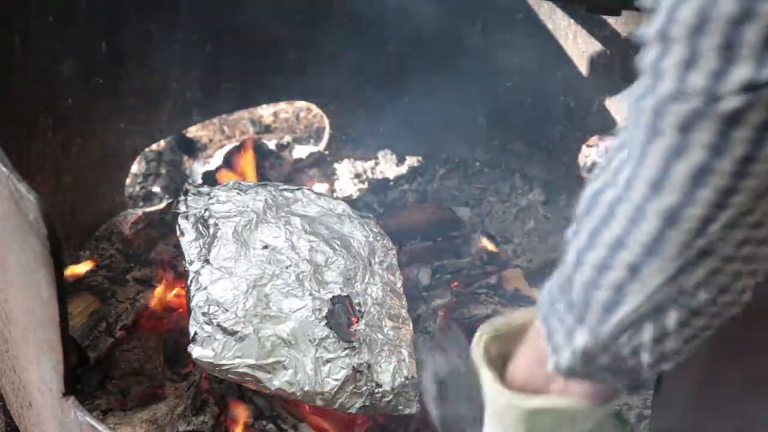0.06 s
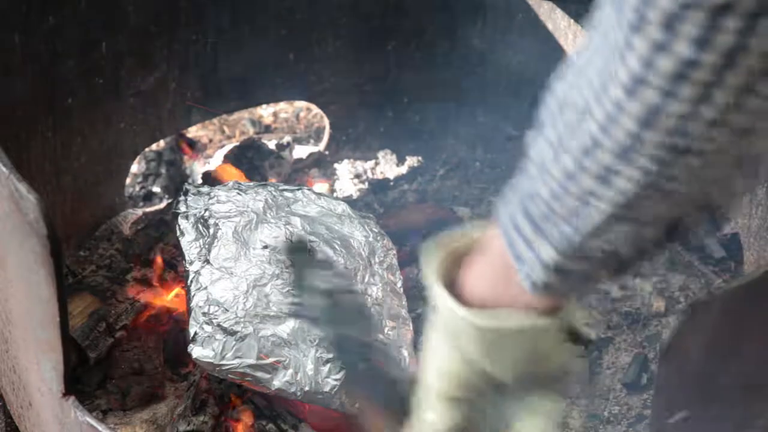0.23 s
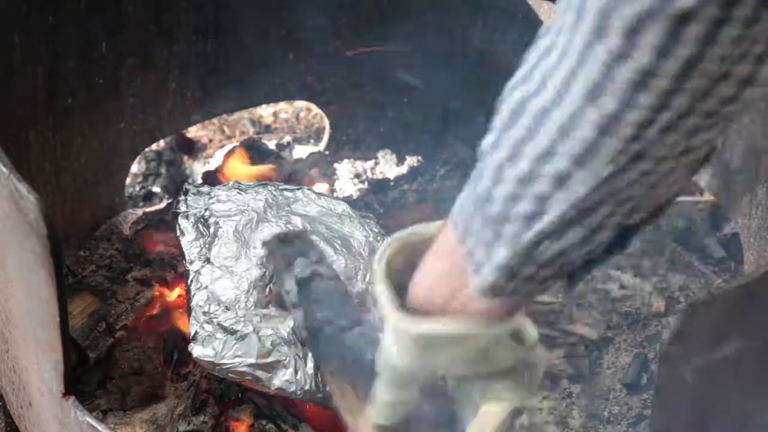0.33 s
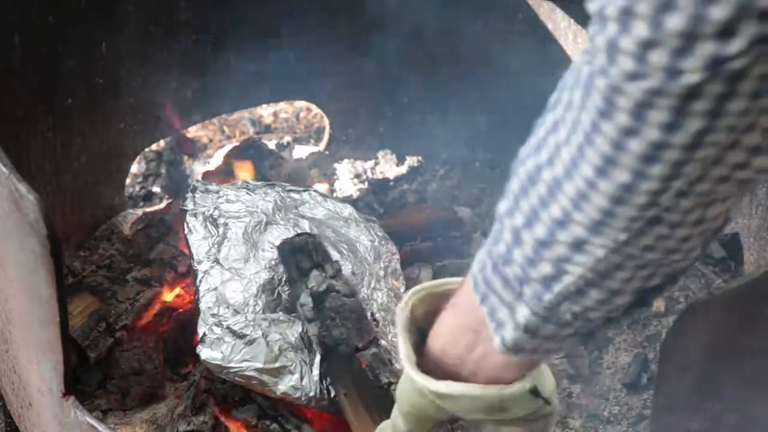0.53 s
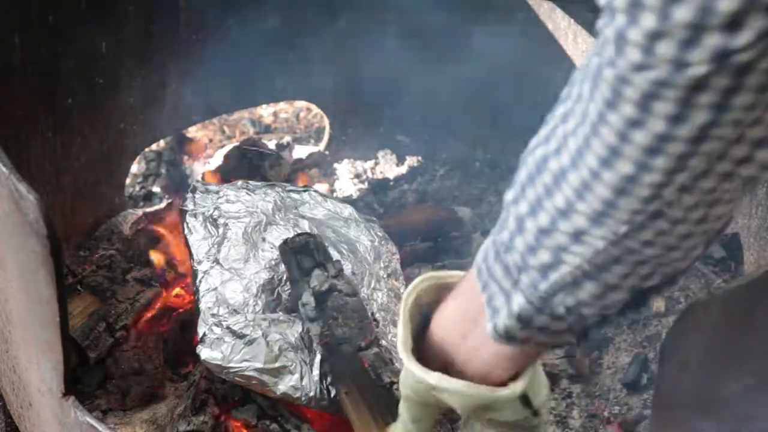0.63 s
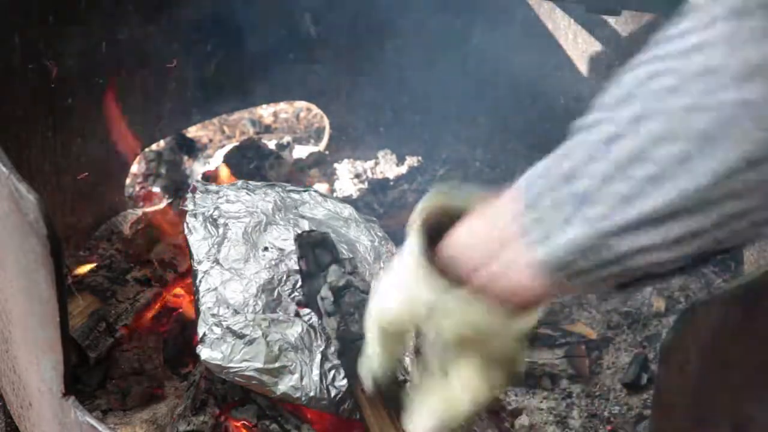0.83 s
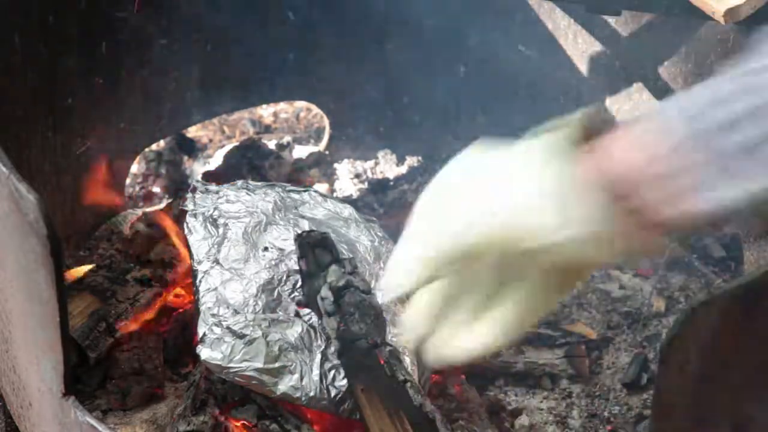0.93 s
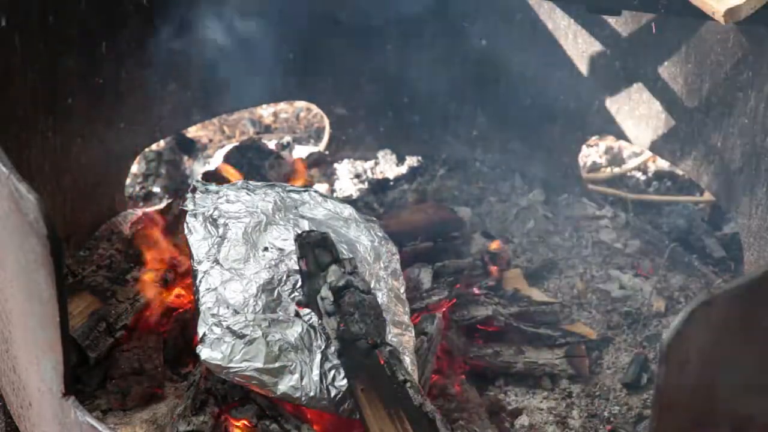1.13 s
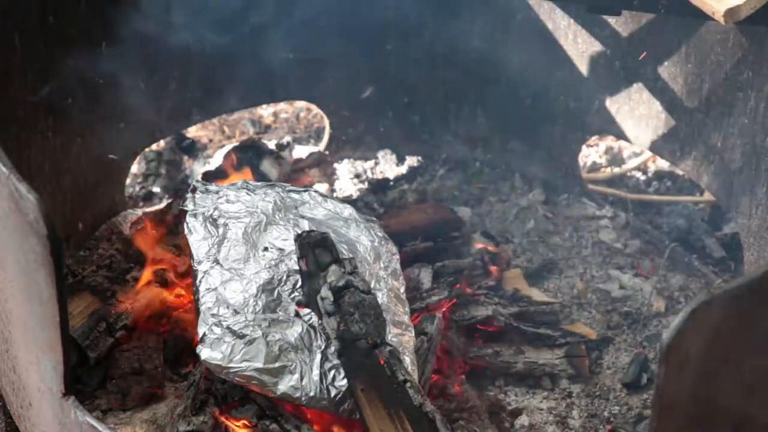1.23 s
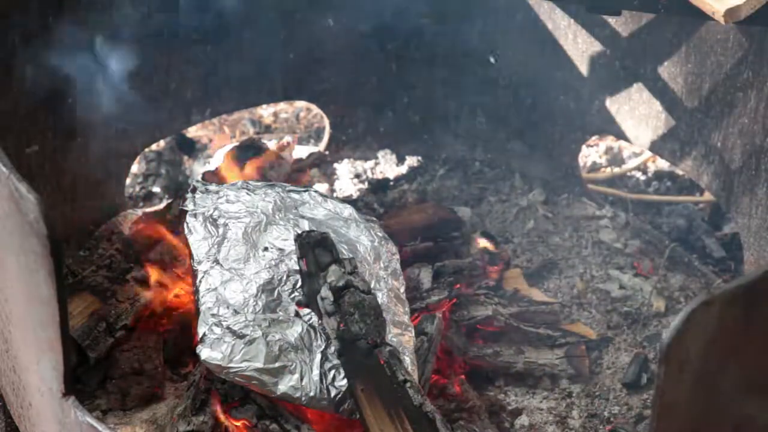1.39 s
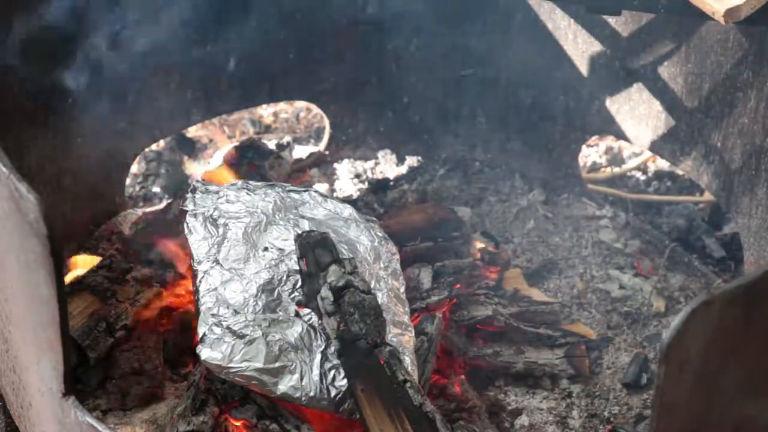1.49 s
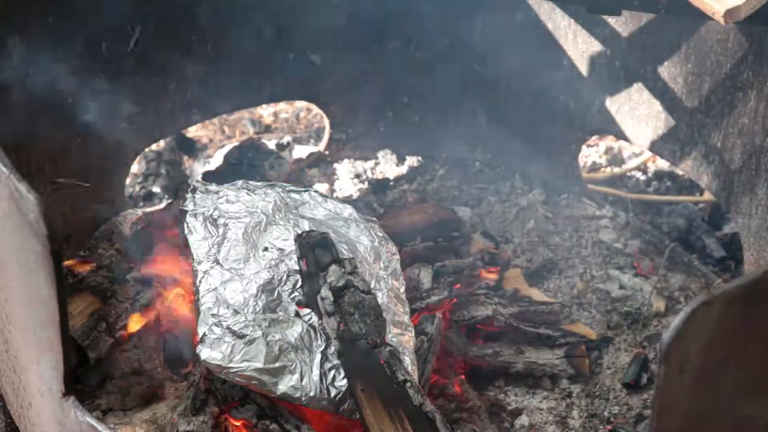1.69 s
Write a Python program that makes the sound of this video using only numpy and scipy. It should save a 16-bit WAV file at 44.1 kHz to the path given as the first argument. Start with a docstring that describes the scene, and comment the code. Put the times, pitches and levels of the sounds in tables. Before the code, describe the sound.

A burnt stick drops on crinkling foil, bouncing once, while a campfire quietly pops and hisses.

```python
"""At a campfire, close to the pit, the microphone nearly mono.
The flames rush softly, embers hiss, and pockets of steam pop and tick in the burning wood.
After a dull soft thud, a charred stick drops on a foil packet in the fire: it knocks, bounces once,
then slides and settles on the crinkling foil. Each knock rings the packet, and the pit walls
answer briefly. A few faint rustles follow."""
import sys
import numpy as np
from scipy import signal
from scipy.fft import rfft, irfft, next_fast_len
from scipy.io import wavfile
from scipy.ndimage import map_coordinates

SR = 44100
rng = np.random.default_rng(int(sys.argv[2]) if len(sys.argv) > 2 else 0)


def generate_wav(signal):
    """Clip the signal to [-1, 1] and save it as 16-bit WAV at the path in sys.argv[1]."""
    frames = np.transpose(np.atleast_2d(signal))
    scaled = np.clip(frames, -1, 1) * 32767
    pcm = np.round(scaled).astype(np.int16)
    wavfile.write(sys.argv[1], SR, pcm)


N = 77175
TIME = np.arange(N) / SR
EVENT_TIME = np.arange(SR // 6) / SR  # seconds into one short sound

# rush of the flames: time_s, level_db
FLAME_LEVEL = [(0, -47), (.2, -54.5), (.3, -54.5), (.75, -53.5), (1.0, -50), (1.15, -52.5), (1.4, -52.5),
               (1.6, -50.5), (1.75, -45)]
# its spectrum: frequency_hz, level_db
FLAME_SPECTRUM = [(25, -10), (60, -15), (130, -13), (190, -8.5), (270, 3), (380, 0), (600, 0), (1200, -11),
                  (2500, -31.5), (6000, -31.5), (16000, -53)]
# hiss of the embers: time_s, level_db
EMBER_LEVEL = [(0, -51.5), (.07, -52), (.13, -50.5), (.25, -55), (.55, -52), (.8, -55.5), (1.2, -62.5),
               (1.75, -59.5)]
# its spectrum: frequency_hz, level_db
EMBER_SPECTRUM = [(500, 16), (2000, -7), (4500, -8), (7000, -3), (10000, -2.5), (16000, 3.5)]
# soft flares of flame and faint brief rustles: peak_s, level_db, half_length_s, centre_hz, width_octaves
FLARES_AND_RUSTLES = [(.139, -40.5, 0.0076, 3280, 0.27), (0.744, -55.5, 0.021, 282, 0.89),
                      (0.986, -51.5, 0.039, 295, 0.49), (1.024, -53.5, 0.022, 1570, 0.36),
                      (1.248, -54.5, .025, 1670, 0.24), (1.733, -47, 0.023, 2260, 0.31)]
# ticks of the embers and, at 0.73 s, a last small crinkle of the foil:
# start_s, level_db, centre_hz, width_octaves, t60_s
SMALL_TICKS = [(.002, -35.5, 7450, 0.94, 0.12), (0.0936, -31, 11100, 0.17, 0.021),
               (0.1673, -33.5, 5560, 1, 0.038), (0.18, -40, 8000, 1, 0.034), (0.199, -39, 9000, 1, 0.019),
               (0.2055, -33.5, 9000, 1, 0.01), (0.222, -33, 14000, 0.2, 0.011),
               (.2845, -39, 13500, 0.23, 0.018), (0.5192, -26, 9150, 0.4, 0.0055),
               (0.525, -24, 8300, 0.15, 0.0044), (.7287, -27.5, 3470, 0.31, 0.012),
               (.844, -35, 12100, 0.37, 0.0089), (1.0416, -32, 2400, 0.27, 0.013),
               (1.108, -37, 7260, 0.37, 0.0071), (1.165, -40.5, 9000, 0.44, 0.011),
               (1.1732, -32.5, 8900, 0.38, 0.011), (1.461, -39, 9000, 1, .012),
               (1.6215, -37.5, 10100, 0.37, 0.01), (1.6452, -36.5, 9600, 0.33, 0.01),
               (1.733, -30.5, 10000, 1, 0.0076)]
# loud pops of the wood: start_s, level_db, low_cut_hz, resonance_hz, t60_s, packet_ring_db
WOOD_POPS = [(0.1041, -15.5, 290, 4600, 0.02, -8.5), (1.191, -17.5, 3300, 4200, 0.0099, -30)]
# their spectrum: frequency_hz, level_db
POP_SPECTRUM = [(100, -34), (800, 4), (1150, -5.5), (1600, 4), (2200, -11), (2750, 2.5), (3400, -8.5),
                (4600, -5.5), (8000, -3.5), (13000, -6), (16000, -15)]
# creases of the foil buckling: start_s, level_db, centre_hz, t60_s
CREASES = [(0.01, -32, 2860, 0.01), (0.4031, -22.5, 1680, 0.017), (.459, -33, 2300, .03),
           (0.4715, -27, 2300, 0.024), (.499, -32, 2000, 0.031), (0.5046, -25, 2090, 0.023),
           (0.5344, -36, 2800, .015), (0.5454, -36, 4220, 0.035), (.569, -40, 3980, 0.018),
           (.658, -24.5, 2520, 0.02), (0.6841, -31, 2000, 0.019), (0.6895, -39, 1700, 0.025)]
# their spectrum: frequency_hz, level_db
CREASE_SPECTRUM = [(100, -5), (300, 1), (1000, -5), (1500, -1), (3500, -3.5), (5500, -7), (13000, 0),
                   (16000, -7)]
# modes of the packet and stick: pitch_hz, level_db
PACKET_MODES = [(180, -17), (278, -7), (466, -6), (619, -11), (816, -1), (940, -10), (1452, -4), (1620, -8),
                (1808, -3), (2142, 0), (2635, -5), (3255, -4), (3525, -7), (4200, -5)]
# a dull soft thud, then the stick's knocks on the packet:
# start_s, level_db, treble_corner_hz, contact_s, crunch_db
THUD_AND_KNOCKS = [(0.251, -34, 330, 0.0063, -15.5), (0.3357, -17.5, 6950, 0.0021, 2.5),
                   (0.391, -20.5, 1040, 0.0033, -5), (0.5852, -36, 690, 0.0025, -22)]
# crushed foil: frequency_hz, level_db
CRUNCH_SPECTRUM = [(100, -5), (300, 5), (900, -12), (1200, -9), (1600, 3), (2600, -0.5), (3300, -2),
                   (5000, -7), (9000, -4), (16000, -6)]
# the stick sliding on the foil: time_s, level_db
SLIDE_LEVEL = [(.33, -50.5), (.35, -43.5), (.42, -43.5), (.46, -40.5), (.51, -40), (.555, -47),
               (.585, -51.5), (.635, -50.5), (.65, -44), (.685, -45), (.705, -49.5)]
# its spectrum: frequency_hz, level_db
SLIDE_SPECTRUM = [(150, -17), (400, -5.5), (1100, -2), (1600, -3), (2200, -4.5), (3000, -6), (5000, -10),
                  (8000, -12), (16000, -9.5)]
# the microphone's colour: frequency_hz, gain_db
MIC_RESPONSE = [(20, -0.5), (4300, 0), (5200, 1), (5950, -7.5), (6700, -1), (7300, -0.5), (8100, 3),
                (9600, -5.5), (12500, -2.5), (16000, -8)]
# its own hiss: frequency_hz, level_db
MIC_HISS_SPECTRUM = [(30, -16), (300, -2), (1000, -0.5), (2000, -7.5), (5000, 2), (16000, 1.5)]

ATTACK_SHARE = 0.22  # rise time as a share of the contact time
RADIATE_HZ = 185  # small bodies radiate little below this
PIT_DB, PIT_T60_S = -23.5, 0.11
MIC_LOW_CUT_HZ, MIC_HISS_DB = 156, -60
TOP_HZ = 15950  # upper limit of the treble


def amp(db):
    """Decibels to gain."""
    return 10 ** (np.asarray(db) / 20)


def unit(x):
    """Scale to rms 1."""
    return x / np.sqrt(np.mean(x ** 2) + 1e-20)


def colour(points, hz):
    """Gain of (frequency_hz, level_db) points on a log axis."""
    f, db = np.transpose(points)
    return amp(np.interp(np.log(hz + 1), np.log(f + 1), db))


def level(points):
    """Gain per sample of (time_s, level_db) points."""
    return amp(np.interp(TIME, *np.transpose(points)))


def hump(hz, centre_hz, octaves, skirt_db):
    """A resonance standing on a flat skirt."""
    return np.exp(-.5 * (np.log2((hz + 1) / centre_hz) / octaves) ** 2) + amp(skirt_db)


def low_cut(hz, corner_hz):
    """Response of a second-order high-pass."""
    return (1j * hz) ** 2 / (corner_hz ** 2 - hz ** 2 + np.sqrt(2) * 1j * hz * corner_hz)


def flutter(depth_db, rate_hz):
    """A gain that wanders smoothly at random."""
    knots = rng.standard_normal(N // 100)
    return amp(depth_db * map_coordinates(knots, [TIME * rate_hz], mode="wrap"))


def filtered(x, response):
    """Pass x through a frequency response."""
    size = next_fast_len(len(x) + SR // 8)
    return irfft(rfft(x, size) * response(np.fft.rfftfreq(size, 1 / SR)), size)[:len(x)]


def noise(response, size=N):
    """Coloured noise of rms 1."""
    return unit(filtered(rng.standard_normal(size), response))


def burst(response, t60_s, rise_s=0.00022, hold_s=0):
    """Coloured noise that starts sharply and dies fast, like a cluster of tiny fractures."""
    attack = 1 - np.exp(-EVENT_TIME / rise_s)
    envelope = attack * amp(-60 * np.maximum(EVENT_TIME - hold_s, 0) / t60_s)
    return unit(envelope * noise(response, len(EVENT_TIME))) * np.sqrt(np.mean(envelope ** 2))


def add(track, start_s, sound):
    """Mix a sound into the track."""
    part = track[max(round(start_s * SR), 0):][:len(sound)]
    part += sound[:len(part)]


def flames():
    """A fluttering low rush and the hiss of embers, with soft flares and faint brief rustles."""
    rush = flutter(depth_db=0.92, rate_hz=30.04) * noise(lambda f: colour(FLAME_SPECTRUM, f))
    hiss = flutter(depth_db=0.99, rate_hz=59) * noise(lambda f: colour(EMBER_SPECTRUM, f))
    out = level(FLAME_LEVEL) * rush + level(EMBER_LEVEL) * hiss
    for peak_s, db, half_length_s, centre_hz, octaves in FLARES_AND_RUSTLES:
        band = lambda f: np.hypot(1, np.log2((f + 1) / centre_hz) / octaves / 2) ** -3.1
        swell = np.exp(-.5 * ((TIME - peak_s) / half_length_s) ** 2)
        out += amp(db) * swell * noise(band)
    return out


def crackle(patter_per_s=15, patter_db=-58):
    """Steam bursts in the wood as pops, ticks and a faint random patter; one tick is the foil's."""
    out = np.zeros(N)
    for start_s, db, low_hz, resonance_hz, t60_s, ring_db in WOOD_POPS:
        resonance = lambda f: hump(f, resonance_hz, octaves=.13, skirt_db=-2)
        split = lambda f: colour(POP_SPECTRUM, f) * resonance(f) / np.hypot(1, (low_hz / (f + 1)) ** 2)
        ring = amp(ring_db) * packet_ring(corner_hz=1010, contact_s=0.00041)
        add(out, start_s, amp(db) * (burst(split, t60_s, rise_s=.0001) + ring))
    for start_s, db, centre_hz, octaves, t60_s in SMALL_TICKS:
        tick = burst(lambda f: hump(f, centre_hz, octaves, skirt_db=-17), t60_s)
        add(out, start_s, amp(db) * tick)
    for when, faintness, pitch in rng.random((int(patter_per_s * N / SR), 3)):
        centre_hz = 4000 * 3.5 ** pitch
        db = patter_db - 3.5 * np.log(faintness + .03)  # a few stand out
        tick = burst(lambda f: hump(f, centre_hz, octaves=.6, skirt_db=-17), t60_s=0.0038)
        add(out, when * N / SR, amp(db) * tick)
    return out


def foil_crinkle(ring_db=-20.5):
    """Single creases give way, each with a snap and a faint ring of the packet."""
    out = np.zeros(N)
    ring = amp(ring_db) * packet_ring(corner_hz=5000, contact_s=0.00028)
    for start_s, db, centre_hz, t60_s in CREASES:
        snap = lambda f: colour(CREASE_SPECTRUM, f) * hump(f, centre_hz, octaves=0.75, skirt_db=-12)
        add(out, start_s, amp(db) * (burst(snap, t60_s, rise_s=0.00031) + ring))
    return out


def packet_ring(corner_hz, contact_s):
    """The packet rings while pressed, then dies fast; modes above the corner are weak."""
    hz, mode_db = np.transpose(PACKET_MODES)[:, :, None]
    t60_s = 0.032 * (hz / 1000) ** -0.15
    fall_db = 60 * np.maximum(EVENT_TIME - contact_s, 0) / t60_s
    signs = (-1) ** np.arange(len(PACKET_MODES))[:, None]
    modes = signs * amp(mode_db - fall_db) * np.sin(2 * np.pi * hz * EVENT_TIME)
    dulled = modes / np.sqrt(1 + (hz / corner_hz) ** 3)
    attack = 1 - np.exp(-EVENT_TIME / (ATTACK_SHARE * contact_s))
    return attack * dulled.sum(0)


def knocks():
    """A dull soft thud, then the stick's knocks, which ring the packet and crush foil."""
    out = np.zeros(N)
    for start_s, db, corner_hz, contact_s, crunch_db in THUD_AND_KNOCKS:
        crushed = lambda f: colour(CRUNCH_SPECTRUM, f) / np.hypot(1, f / corner_hz)
        crunch = burst(crushed, t60_s=0.029, rise_s=ATTACK_SHARE * contact_s, hold_s=contact_s)
        add(out, start_s, amp(db) * (packet_ring(corner_hz, contact_s) + amp(crunch_db) * crunch))
    return out


def stick_slide():
    """The stick scrapes over the foil in fine grains."""
    grains = unit(rng.standard_normal(N) * flutter(depth_db=1.6, rate_hz=400))
    return level(SLIDE_LEVEL) * unit(filtered(grains, lambda f: colour(SLIDE_SPECTRUM, f)))


def pit_walls(x):
    """The near walls of the fire pit answer with a short, slightly dull tail."""
    tail = burst(lambda f: 1 / np.hypot(1, f / 6000), PIT_T60_S, rise_s=0.0016)
    return signal.fftconvolve(x, tail / np.linalg.norm(tail))[:N]


def scene():
    """Fire and stick lie close and straight ahead, the same in both channels."""
    fire = flames()
    solids = knocks() + stick_slide() + foil_crinkle() + crackle()
    radiated = filtered(solids, lambda f: low_cut(f, RADIATE_HZ))
    centre = fire + radiated + amp(PIT_DB) * pit_walls(radiated)
    return np.array([centre, centre])


def record(dry):
    """The microphone's colour and bass cut, each channel's own faint hiss, then the treble limit."""
    out = []
    for channel in dry:
        heard = filtered(channel, lambda f: colour(MIC_RESPONSE, f) * low_cut(f, MIC_LOW_CUT_HZ))
        hiss = amp(MIC_HISS_DB) * noise(lambda f: colour(MIC_HISS_SPECTRUM, f))
        out.append(filtered(heard + hiss, lambda f: f < TOP_HZ))
    return np.array(out)


dry = scene()
out = record(dry)
generate_wav(out)
```